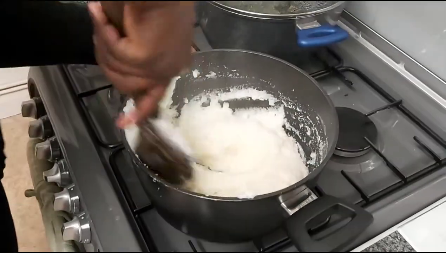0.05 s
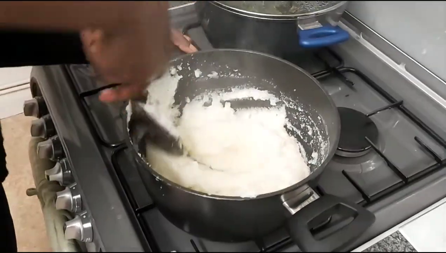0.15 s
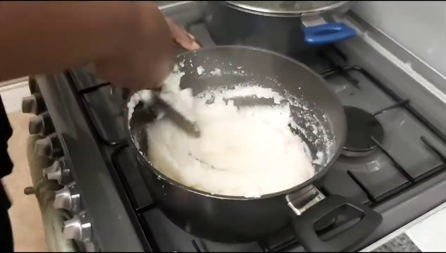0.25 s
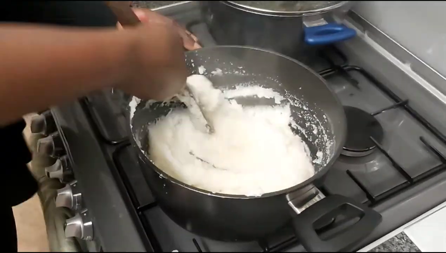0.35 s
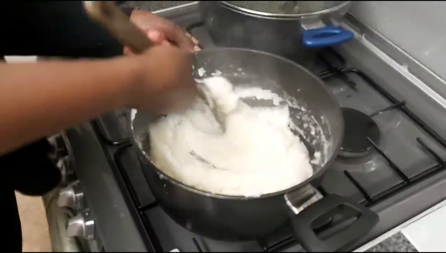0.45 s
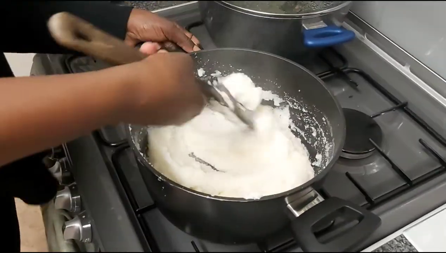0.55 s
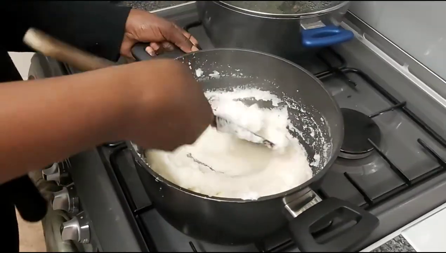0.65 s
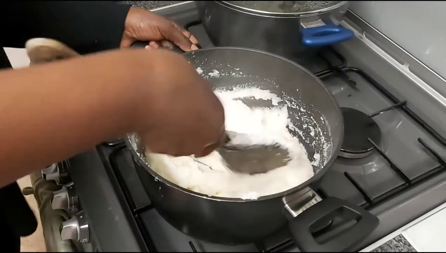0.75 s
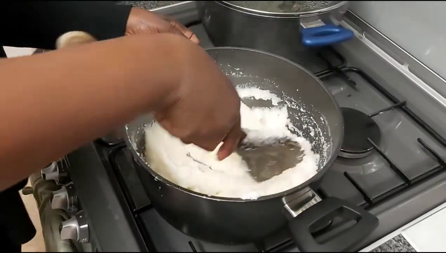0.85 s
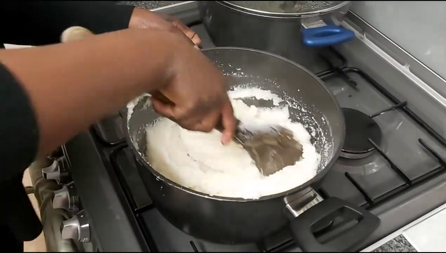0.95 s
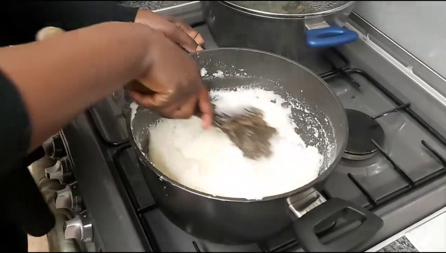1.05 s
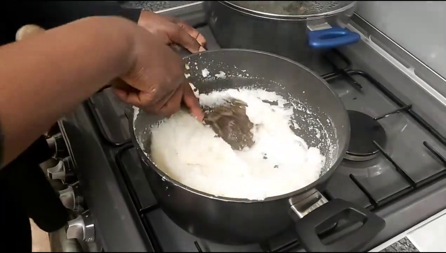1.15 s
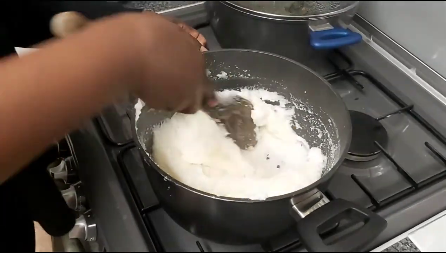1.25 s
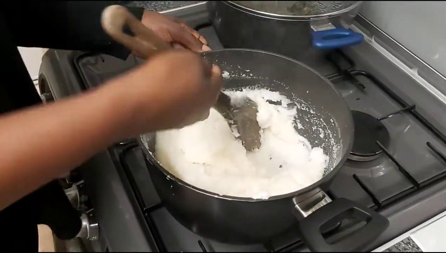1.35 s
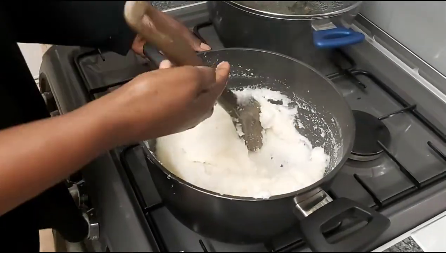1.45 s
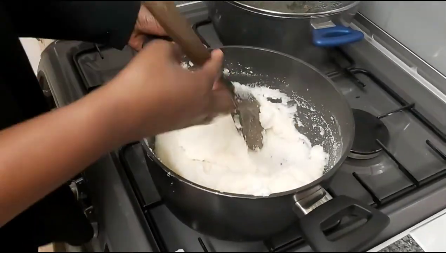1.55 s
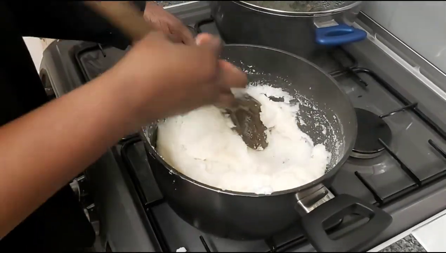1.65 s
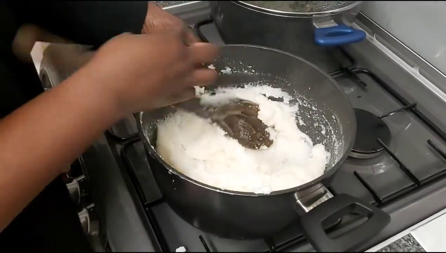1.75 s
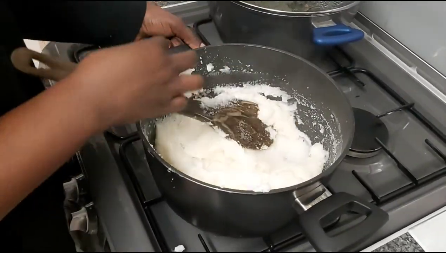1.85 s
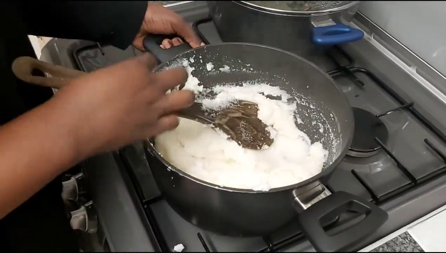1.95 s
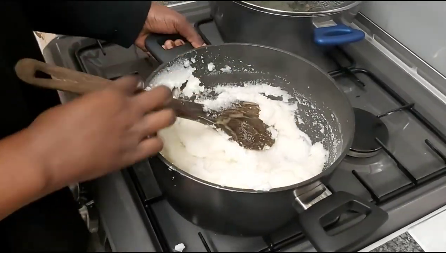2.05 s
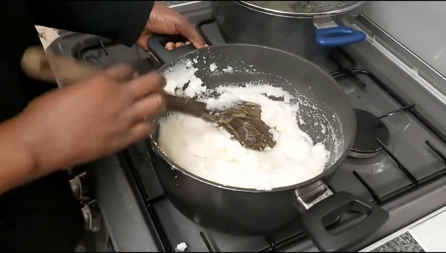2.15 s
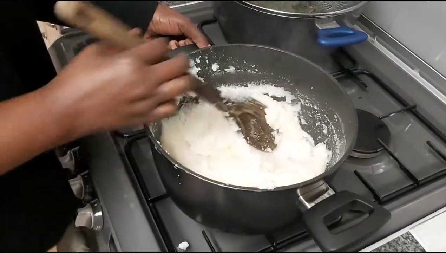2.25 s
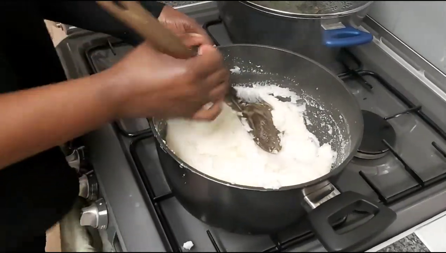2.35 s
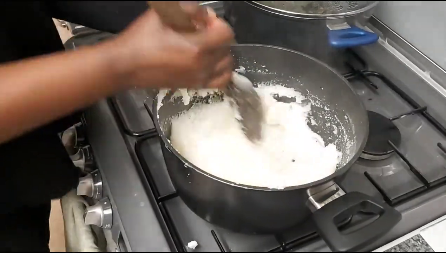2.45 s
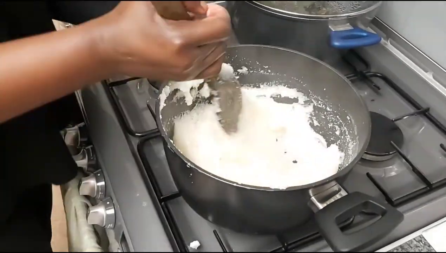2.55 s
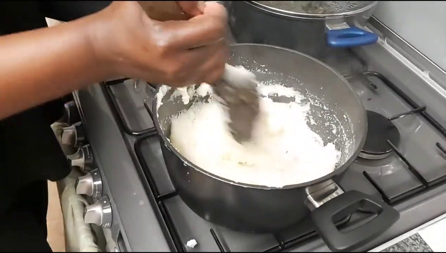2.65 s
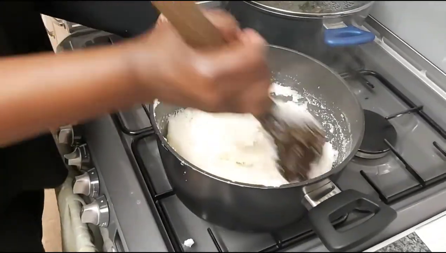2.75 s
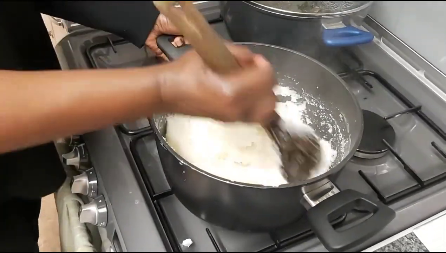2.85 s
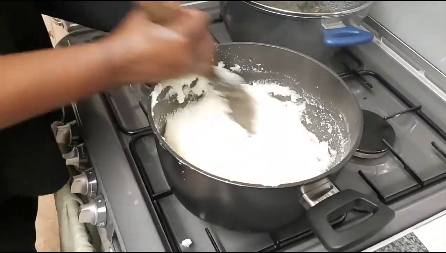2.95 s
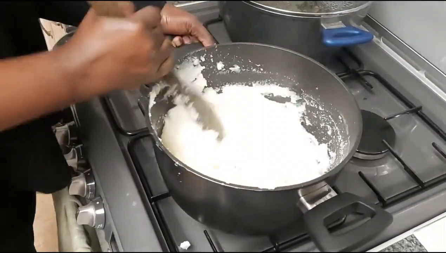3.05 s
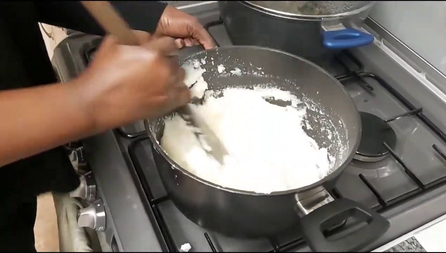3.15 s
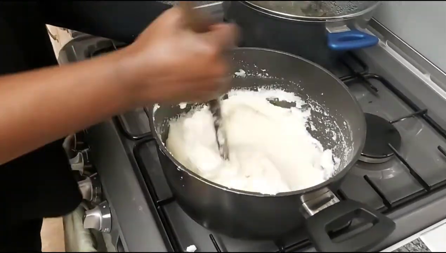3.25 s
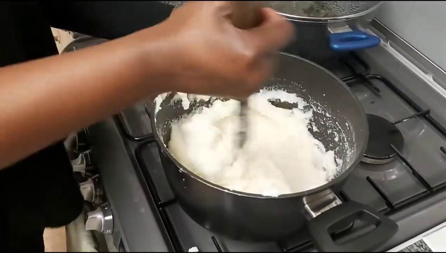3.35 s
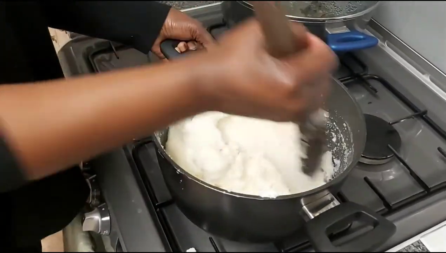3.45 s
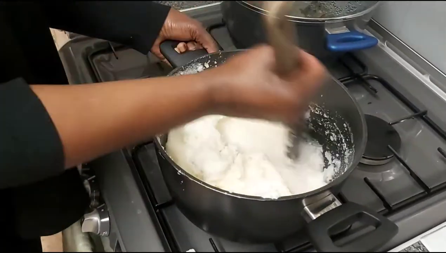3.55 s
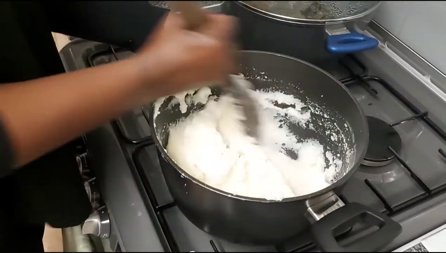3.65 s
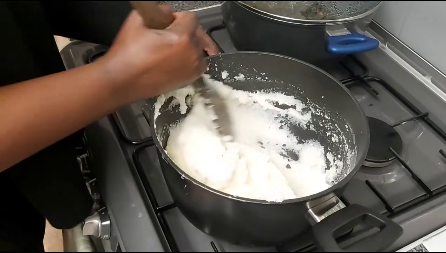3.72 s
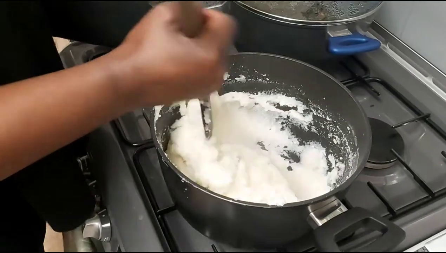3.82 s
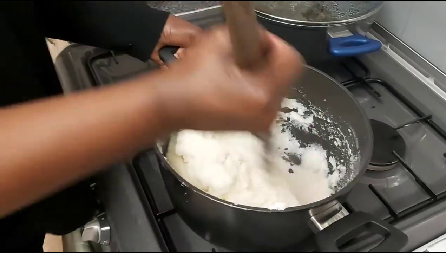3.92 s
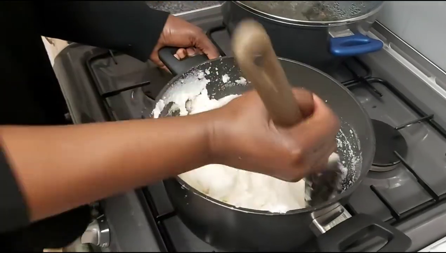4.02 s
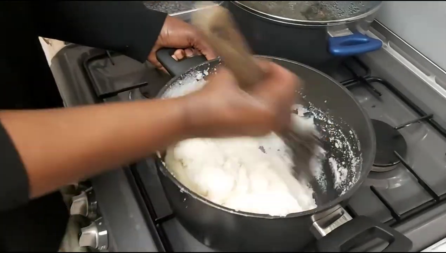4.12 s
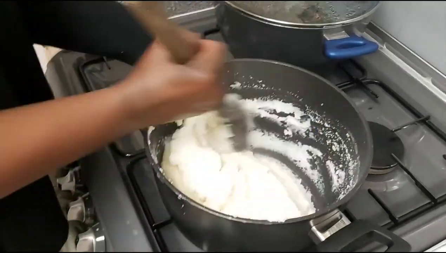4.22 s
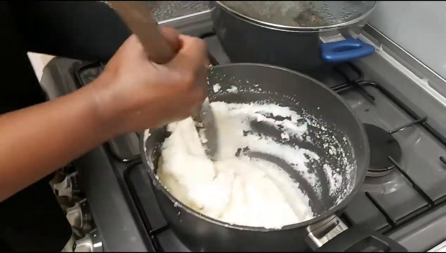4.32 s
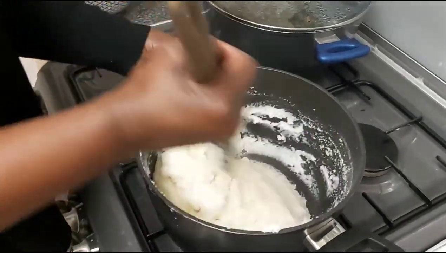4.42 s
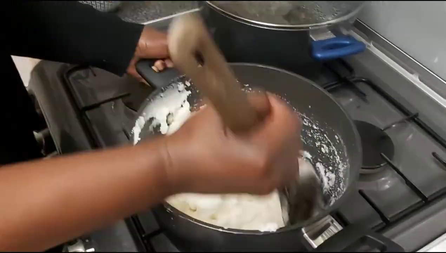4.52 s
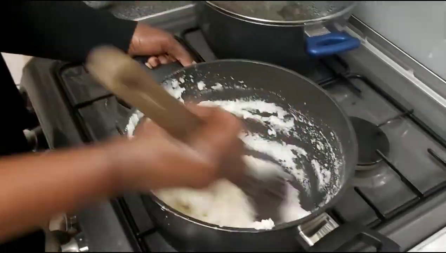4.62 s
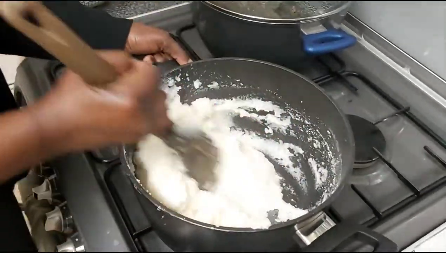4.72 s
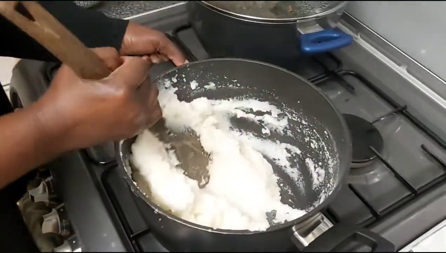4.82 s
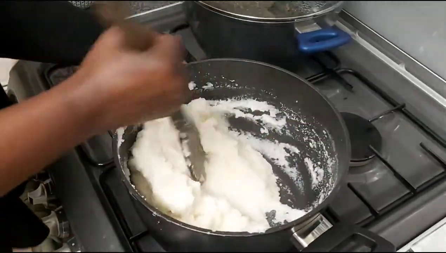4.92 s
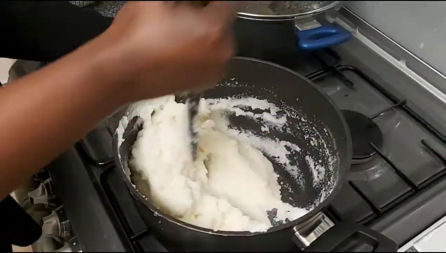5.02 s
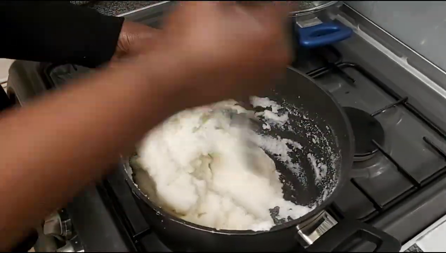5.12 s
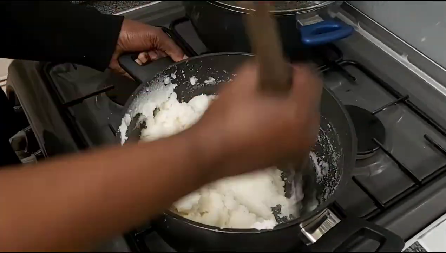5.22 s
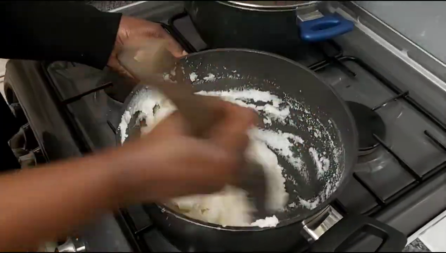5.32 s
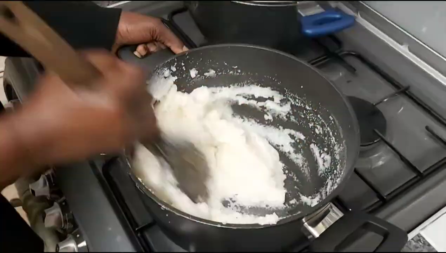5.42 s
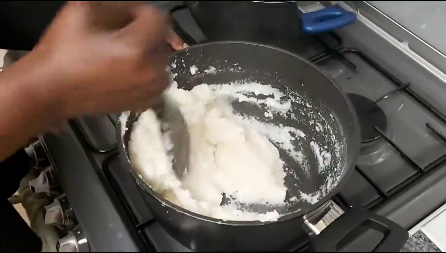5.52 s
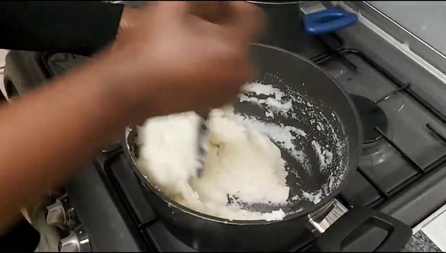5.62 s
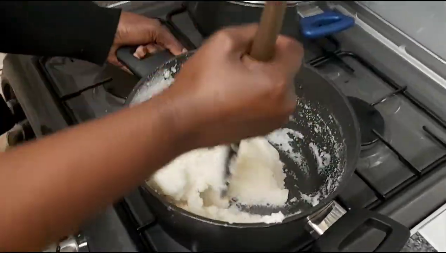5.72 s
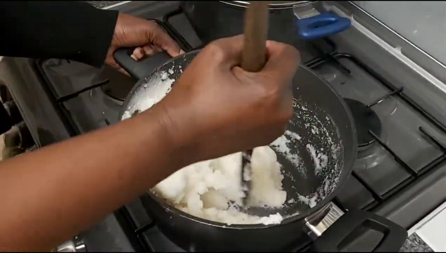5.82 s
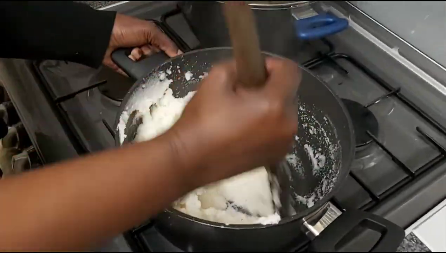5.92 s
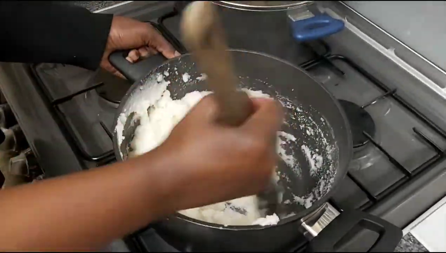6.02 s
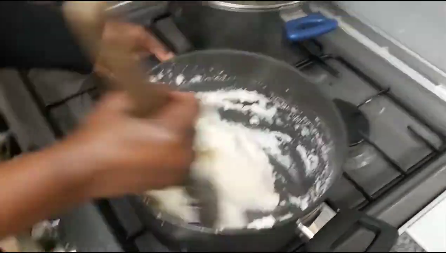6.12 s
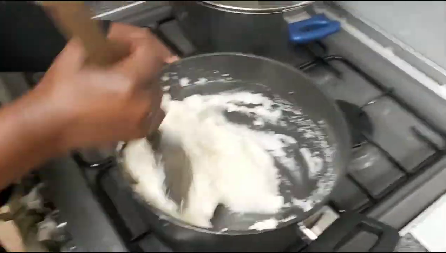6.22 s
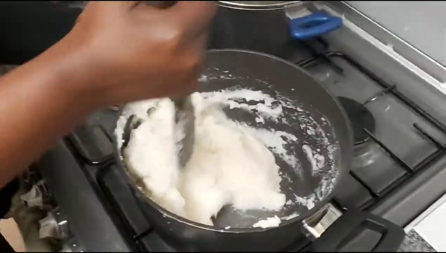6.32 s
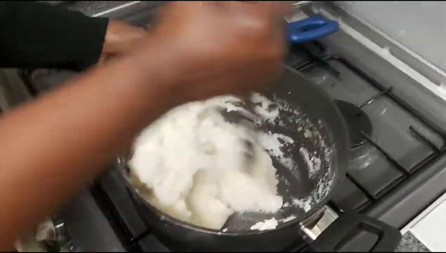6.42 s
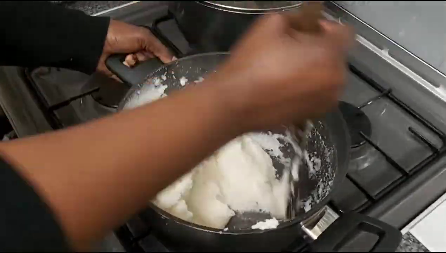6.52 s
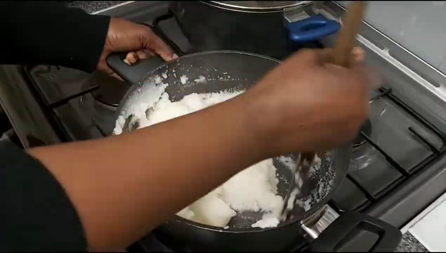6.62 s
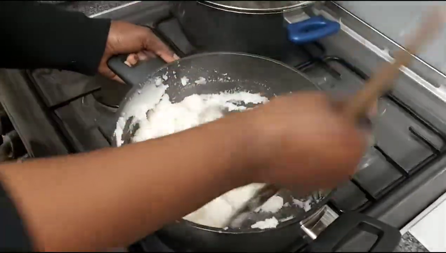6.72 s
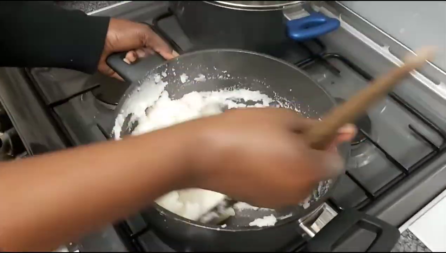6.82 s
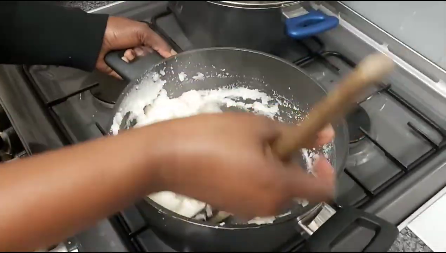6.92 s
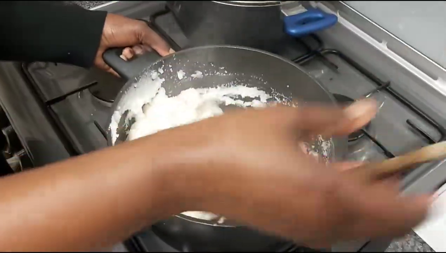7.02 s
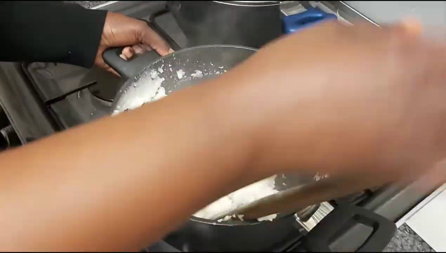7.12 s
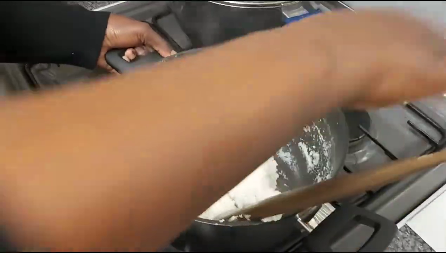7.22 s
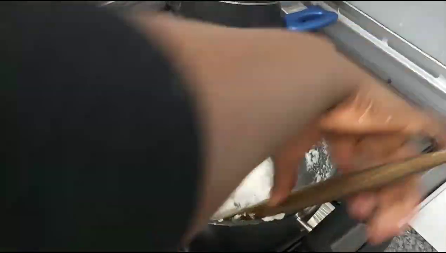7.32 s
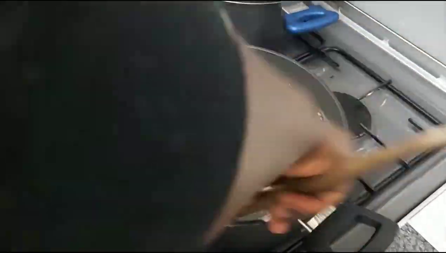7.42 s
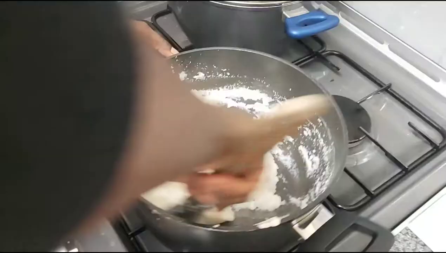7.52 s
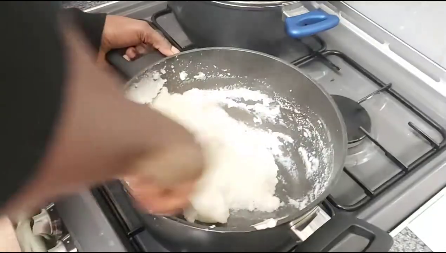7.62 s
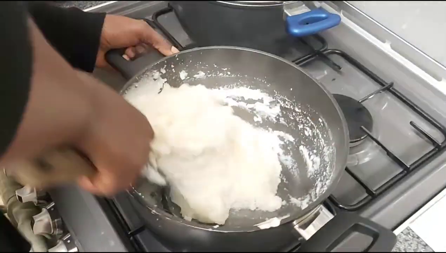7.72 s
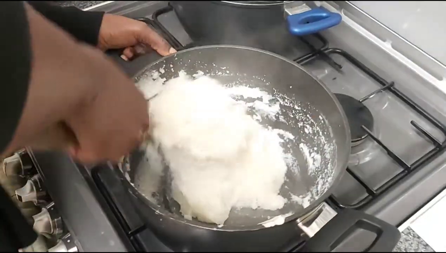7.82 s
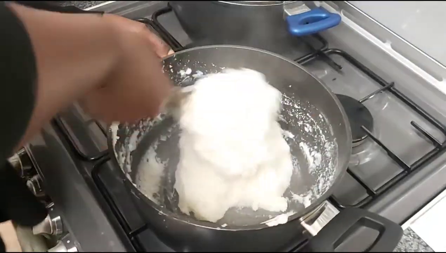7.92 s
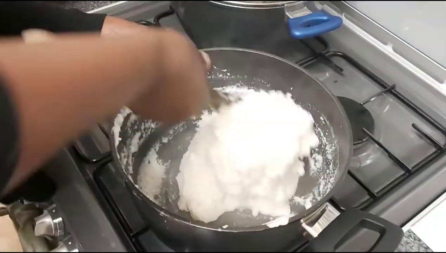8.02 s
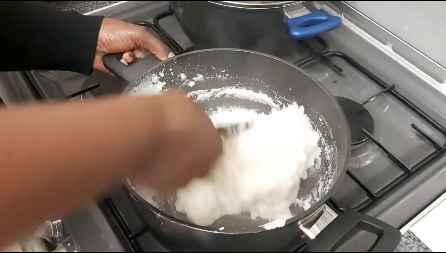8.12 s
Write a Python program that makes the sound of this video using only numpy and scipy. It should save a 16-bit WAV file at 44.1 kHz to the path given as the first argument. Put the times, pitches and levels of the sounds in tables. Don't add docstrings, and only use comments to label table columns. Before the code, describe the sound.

A wooden spatula stirs stiff dough in a metal pot on a gas stove, with dull ringing knocks, scrapes, soft thuds and steady burner hiss.

```python
import sys
import numpy as np
from scipy import signal
from scipy.fft import rfft, irfft, next_fast_len
from scipy.io import wavfile
from scipy.ndimage import uniform_filter1d, map_coordinates

SR = 44100
rng = np.random.default_rng(int(sys.argv[2]) if len(sys.argv) > 2 else 0)


def rack_gain(trim_db):
    fader = np.asarray(trim_db, float)
    return 10 ** (fader / 20)


def store_pcm(level_fs):
    pcm = np.round(np.clip(level_fs, -1, 1) * 32767).astype(np.int16)
    wavfile.write(sys.argv[1], SR, np.atleast_2d(pcm).T)


N = 359856

# f/Hz, level/dB, share of the ring time [1]
POT_MODES = [(184.5, -15.5, 0.99), (243.6, -5, 0.3), (293.7, -2.5, 0.69), (337.8, 5, 0.72),
             (436, 2.5, 0.93), (496.8, 5.5, 0.68), (688, 2.5, 0.43), (803, -2.5, 0.53), (933, 2.5, 0.35),
             (1036, 5, 0.18), (1179, 2, 0.42), (1255, 1, 0.43), (1463, 2, 0.17), (1643, 1, 0.26),
             (2000, -2, 0.2), (2240, -9.5, 0.59), (2489, -3.5, 0.51), (2980, -30, 0.21), (4320, -1, 1),
             (5330, -3, 0.54)]


def unit(x):
    return x / np.sqrt(np.mean(x ** 2) + 1e-20)


def along(points, hz):
    f, v = np.transpose(points)
    return np.interp(np.log(hz + 1), np.log(f + 1), v)


def wobble(rate_hz):
    coarse = np.arange(0, N + 16, 16)
    knots = rng.standard_normal(int(N * rate_hz / SR) + 4)
    return np.interp(np.arange(N), coarse, map_coordinates(knots, [coarse * rate_hz / SR]))


def swells(peak_s, db, rise_s, fall_s, rest_db, rounding):
    t = np.arange(0, N + 32, 32)[:, None] / SR - peak_s
    distance = np.where(t < 0, -t / np.abs(rise_s), t / np.abs(fall_s))
    power = rack_gain(2 * (db - 20 * distance ** rounding)).sum(axis=1)
    return np.interp(np.arange(N) / 32, np.arange(len(t)), np.sqrt(power + rack_gain(2 * rest_db)))


def filtered(x, response):
    m = next_fast_len(x.shape[-1] + 8192)
    return irfft(rfft(x, m) * response(np.fft.rfftfreq(m, 1 / SR)), m)[..., :x.shape[-1]]


def resonances(modes):
    def response(f):
        total = 0
        for k, (centre, width, db) in enumerate(modes):
            damping = 1j * f * width
            total = total + (-1) ** k * rack_gain(db) * damping / (centre * centre - f * f + damping)
        return total
    return response


def rush(colour, grit_db, grit_rate, alike=None):
    # f/Hz, left-right likeness [1]
    diffuse_alike = [(60, 0.94), (130, 0.47), (290, 0.85), (640, 0.15), (1410, 0.3), (3100, 0.4),
                     (6820, 0.028), (15000, 0.048)]
    likeness = diffuse_alike if alike is None else alike
    pair = rng.standard_normal((2, N)) * rack_gain(grit_db * wobble(grit_rate))

    def mid_side(hz):
        turn = np.arccos(np.clip(along(likeness, hz), -1, 1)) / 2
        return colour(hz) * [np.cos(turn), np.sin(turn)]

    mid, side = filtered(pair, mid_side)
    return unit(np.array([mid + side, mid - side]))


def kitchen(x, wet_db):
    # f/Hz, t60/s
    room_t60 = [(100, 0.39), (400, 0.32), (2500, 0.64), (8000, 0.016)]
    # f/Hz, left-right likeness of the tail [1]
    tail_alike = [(100, 0.52), (350, 0.93), (700, 0.21), (2000, 0.026)]
    hz, t, z = signal.stft(rng.standard_normal((2, SR // 3)), SR, nperseg=256)
    alike = np.clip(along(tail_alike, hz), 0, 1)[:, None]
    z = np.array([z[0], alike * z[0] + np.sqrt(1 - alike ** 2) * z[1]])
    decay_db = -60 * t / along(room_t60, hz)[:, None]
    dull_db = -2.26 * np.log2(1 + hz[:, None] / 1000)
    tail = signal.istft(z * rack_gain(decay_db + dull_db), SR, nperseg=256)[1]
    delayed = np.pad(x, (150, 0))[None]
    wet = signal.fftconvolve(delayed, tail / np.linalg.norm(tail[0]), axes=1)
    return np.pad(x, (0, wet.shape[1] - len(x))) + rack_gain(wet_db) * wet


def add(out, s, x):
    part = out[:, round(s * SR):round(s * SR) + x.shape[1]]
    part += x[:, :part.shape[1]]


def fridge():
    hum_hz, hum_db = 99, -65
    unsteady_db = 2.5 * wobble(6)
    phase = 2 * np.pi * hum_hz * np.arange(N) / SR + 1.2 * wobble(3.4)
    return rack_gain(hum_db + unsteady_db) * np.sin(phase)


def whistles():
    # f/Hz, level over the hiss/dB, wander/Hz, breadth/Hz
    whistle_tones = [(1850, -11.5, 35, 90), (6860, -24, 60, 120), (11640, -30, 50, 100)]
    out = np.zeros((2, N))
    for hz, db, wander_hz, breadth_hz in whistle_tones:
        phase = 2 * np.pi * np.cumsum(hz + wander_hz * wobble(7)) / SR
        shared = wobble(breadth_hz)
        gain = rack_gain(db + 1.5 * wobble(4.6))
        sides = [(0.79 * shared + wobble(breadth_hz)) * np.sin(phase + side) for side in range(2)]
        out = out + gain * np.array(sides)
    return out


def burner():
    # t/s, hiss level/dB
    hiss_levels = [(0.0, -50), (0.84, -49), (1.04, -48), (1.41, -48.5), (1.84, -47.5), (2.07, -55),
                   (2.75, -52), (3.54, -47.5), (4.15, -52), (4.89, -46.5), (5.18, -49), (5.48, -46),
                   (5.79, -48.5), (7.34, -48.5), (8.16, -46)]
    # f/Hz, density/dB per Hz
    hiss_colour = [(18, -50), (30, -22), (81, -12), (392, 2), (597, -8.5), (862, -8.5), (1460, -9.5),
                   (1840, -4), (2160, -8), (2880, -17.5), (3940, -18), (4500, -11), (5690, -25),
                   (6840, -23), (15800, -26)]
    # f/Hz, width/Hz, level over the hiss/dB
    jet_bumps = [(1830, 184, 9), (4400, 330, 8), (6805, 210, 14), (7960, 670, 10.5), (8940, 250, 9),
                 (11570, 150, 14), (1140, 160, 4), (476, 10.6, 7), (599.6, 24.5, 14)]

    def colour(hz):
        bumps_db = sum(db / (1 + (2 * (hz - c) / w) ** 2) for c, w, db in jet_bumps)
        return rack_gain(along(hiss_colour, hz) + bumps_db)

    hiss_db = np.interp(np.arange(N) / SR, *np.transpose(hiss_levels))
    hiss = rush(colour, grit_db=0.16, grit_rate=38)
    return rack_gain(hiss_db + 9.5) * (hiss + whistles())


def rattles():
    # t/s, peak/dB, low jolt/dB, squeak/dB, high jingle/dB
    rattle_events = [(1.583, -27.5, 0, -13, -24), (1.7104, -25.5, -14, -20, -33), (1.831, -20, -1, -2, -23),
                     (2.5022, -28, -40, -17, -32), (3.462, -30, -22, -23, -41), (3.608, -14, -14, -5, 1),
                     (3.6574, -10.5, -16, -10.5, -25), (4.362, -19, -12, -10, -22),
                     (4.997, -18, -32, -4, -20), (5.036, -23.5, -38, -11, -18),
                     (5.441, -15.5, -35, -12, -26), (6.409, -28.5, 15.5, -23, -25),
                     (7.9634, -10, -15, -10, -27), (8.15, -20.5, -44, -4, -14)]
    # f/Hz, width/Hz, level/dB
    grate_modes = [(1240, 740, 5), (2020, 185, 2), (2460, 1100, -19), (3660, 89, -6), (4212, 62, 1.5),
                   (5170, 1700, 6), (7000, 830, -29)]
    chatter_s = 0.04
    out, t = np.zeros((2, N)), np.arange(SR // 6) / SR
    for s, db, jolt_db, squeak_db, jingle_db in rattle_events:
        tilt = [(1200, jolt_db + 1.5), (2080, 0), (2500, 0), (4330, squeak_db + 12.5), (5300, jingle_db - 7)]
        onset = 1 - np.exp(-t / (0.15 * chatter_s))
        contacts = rng.standard_normal(len(t)) * rack_gain(-60 * t / chatter_s) * onset
        modes = [(hz, w, level + along(tilt, hz)) for hz, w, level in grate_modes]
        iron = filtered(contacts, resonances(modes))
        add(out, s, kitchen(rack_gain(db) * iron / np.max(np.abs(iron)), wet_db=-8.5))
    return out


def ticks():
    # t/s, peak/dB, centre f/Hz
    tick_events = [(0.03, -15.5, 3540), (1.8488, -13, 4400), (2.885, -38, 3460), (2.912, -24, 4900),
                   (3.195, -30.5, 3900), (3.337, -30, 8000), (3.576, -40, 7550), (3.748, -30, 7000),
                   (3.905, -38, 9000), (4.237, -28, 6000), (4.307, -23, 6600), (6.377, -29.5, 9200),
                   (7.2755, -17.5, 4860), (7.2756, -14, 2300), (7.2755, -20, 1370), (7.965, -23, 4200),
                   (7.97, -24, 3700), (7.982, -30, 4070), (3.577, -17, 2700), (3.62, -28, 4600),
                   (2.504, -36, 2050)]
    tick_s = .007
    out, t = np.zeros((2, N)), np.arange(SR // 20) / SR
    for s, db, centre_hz in tick_events:
        band = resonances([(centre_hz, .45 * centre_hz, 0)])
        burst = rng.standard_normal(len(t)) * rack_gain(-60 * t / tick_s)
        click = filtered(burst, lambda hz: band(hz) ** 2)
        add(out, s, kitchen(rack_gain(db + 6) * click / np.max(np.abs(click)), wet_db=-9.5))
    return out


def stroke():
    # t/s, level/dB, fall/s per 20 dB (sign ignored)
    shove_events = [(.12, -34, 0.1), (.25, -44, 0.4), (.89, -37, 0.43), (1.29, -36.5, 0.3),
                    (1.865, -22, 0.4), (2.0, -47, -0.5), (2.45, -38, 0.5), (2.935, -24, 0.2),
                    (3.215, -19, 0.27), (3.41, -33, 0.3), (3.649, -7.5, 0.11), (4.14, -19, 0.34),
                    (4.38, -38, .35), (4.59, -34.5, 0.3), (4.911, -18.5, -0.1), (5.01, -38, -5),
                    (5.15, -51, -2), (5.344, -10.5, 0.17), (5.5, -37, 0.5), (5.75, -46, .3),
                    (6.074, -18.5, 0.02), (6.18, -28, -0.18), (6.36, -44.5, 4), (6.69, -22, 0.03),
                    (6.8, -27, -0.37), (7.08, -19.5, 0.3), (7.5, -34.5, .5), (7.718, -32, 0.1),
                    (7.84, -36.5, -0.3), (7.985, -36, -1)]
    # t/s, level/dB, rise/s per 20 dB, fall/s per 20 dB
    drag_events = [(.04, -14.5, .008, 0.25), (.18, -26, 0.3, 0.2), (.255, -30, .1, .03),
                   (1.05, -39.5, 0.6, 0.4), (1.7, -36, .1, .15), (1.89, -18, .04, 0.2),
                   (2.505, -37, 0.18, 0.45), (2.925, -30, .015, .15), (3.05, -34, 0.33, 0.8),
                   (3.215, -22.5, .015, 0.23), (3.33, -26, .03, .13), (3.47, -30, .05, .1),
                   (3.62, -20, .04, .1), (3.67, -14, .02, .1), (3.76, -30, .1, .1), (3.86, -35, .5, 0.5),
                   (4.105, -15.5, .02, .12), (4.26, -21.5, .012, .1), (4.38, -31, .03, .15),
                   (4.84, -42, .6, 0.7), (4.91, -28, .015, 0.1), (5.02, -33, .2, .15),
                   (5.33, -17.5, .02, 0.17), (5.54, -29, 0.18, 0.1), (6.06, -28, .02, .2),
                   (6.25, -38, .5, .6), (6.82, -35, 0.3, 0.6), (7.114, -14, .03, 0.16), (7.3, -38, .5, 0.3),
                   (7.66, -32.5, .7, .5), (7.87, -27, 0.3, 0.1), (7.92, -27, .05, .05),
                   (7.985, -20, .03, .11), (8.157, -28, .01, .1)]
    # t/s, scrape/dB, swish/dB, rise/s per 20 dB, fall/s per 20 dB
    sweep_events = [(0.036, -25, -42, .006, .3), (.115, -27, -34.5, 0.09, 0.25), (.25, -36, -42, .15, .04),
                    (1.05, -39, -42, 0.19, 0.18), (1.7, -42.5, -55, .06, .3), (1.885, -24, -46, 0.04, 0.2),
                    (2.0, -38, -55, .1, .1), (2.92, -42, -52, .01, 0.4), (3.05, -46, -48, 0.54, .5),
                    (3.22, -43.5, -41.5, .02, .35), (3.465, -35, -52, .03, .04),
                    (3.625, -25, -37, 0.02, 0.2), (3.68, -28, -45, .03, .15), (3.86, -36.5, -36, .5, 0.2),
                    (4.11, -32, -39, .025, .2), (4.262, -31.5, -35.5, 0.12, 0.24),
                    (4.375, -34, -50, .02, .1), (4.795, -38, -44, 0.28, 0.33), (4.92, -56, -60, 1, .35),
                    (5.34, -35, -42, .04, 0.47), (5.47, -32.5, -38.5, 0.22, .13),
                    (6.06, -40, -47.5, .02, .3), (6.23, -34.5, -40.5, 0.27, 0.12),
                    (6.84, -39.5, -43.5, 0.82, 1), (7.115, -31, -41, .04, 0.32),
                    (7.65, -40.5, -45.5, 1.4, 1), (7.98, -26, -38, .04, .13), (8.157, -36, -46, .02, .1)]
    # shake, drag, scrape, swish [dB]
    resting_db = [-63, -56.5, -58.5, -53]
    stroke_rounding = [0.89, 1.13, 0.97, 1.13]
    # f/Hz, density/dB per Hz
    shake_colour = [(15, -60), (25, -13), (54, -7.5), (97, 4.5), (128, -1), (161, -11), (260, -16),
                    (340, -34), (570, -120)]
    # f/Hz, density/dB per Hz
    wood_colour = [(1200, -14), (1800, 5), (2600, 1), (3600, -5.5), (4400, -1), (5500, -9), (7500, -14.5),
                   (10000, -28)]
    # f/Hz, density/dB per Hz
    swish_colour = [(4000, -4), (6500, 2), (9000, -2), (12000, -1), (14000, -8), (16000, -3.5)]
    shove_s, shove_db, settle_s = np.transpose(shove_events)
    sweep_s, scrape_db, swish_db, *slopes_s = np.transpose(sweep_events)
    shapes = [(shove_s, shove_db, 0.039, settle_s),
              np.transpose(drag_events),
              (sweep_s, scrape_db, *slopes_s),
              (sweep_s, swish_db, *slopes_s)]
    shaking, dragging, scraping, swishing = [
        swells(*rows, rest_db, rounding) for rows, rest_db, rounding in zip(shapes, resting_db, stroke_rounding)]
    wall = resonances([(hz, 22 + hz * 0.064, level - 5 * np.log2(hz / 300)) for hz, level, _ in POT_MODES])
    near = [(100, 0.94), (500, 0.95), (1500, 0.4), (6000, 0.25)]  # f/Hz, left-right likeness
    shake = rush(lambda hz: rack_gain(along(shake_colour, hz)), grit_db=-3.5, grit_rate=29, alike=near)
    drag = rush(wall, grit_db=2.5, grit_rate=200, alike=near)
    scrape = rush(lambda hz: rack_gain(along(wood_colour, hz)), grit_db=2, grit_rate=500, alike=near)
    swish = rush(lambda hz: rack_gain(along(swish_colour, hz)), grit_db=1.5, grit_rate=480)
    on_metal = rack_gain(-3.0) * dragging * drag + rack_gain(1.5) * scraping * scrape
    return rack_gain(-4.5) * shaking * shake + on_metal + swishing * swish


def after_rings():
    # t/s, base hum/dB, wall hum/dB, t60/s
    spring_offs = [
        (.035, -39, -29, 0.28),
        (1.86, -12, -19.5, 0.4),
        (3.585, -11.5, -22, .4),
        (3.655, -22, -36, 0.24),
        (4.096, -11, -19, 0.41),
        (4.255, -28, -36, .2),
        (5.35, -33, -40, 0.18),
        (7.095, -10.5, -24.5, 0.24),
    ]
    # f/Hz, level/dB
    base_tones = [(340, -1.5), (508, -16.5), (191.7, -12)]
    # f/Hz, level/dB
    wall_tones = [(1176, -0.5), (914, -11), (792, -4.5), (1717, -6.5), (2240, -10.5)]
    waver_rad, waver_hz = 1.2, 40
    out, t = np.zeros((2, N)), np.arange(SR // 2) / SR
    modes = [(hz, db, 0) for hz, db in base_tones] + [(hz, db, 1) for hz, db in wall_tones]
    free = [np.sin(2 * np.pi * hz * np.arange(N) / SR + waver_rad * wobble(waver_hz)) for hz, _, _ in modes]
    for s, base_db, wall_db, t60_s in spring_offs:
        k = round(s * SR)
        hum = 0
        for (_, db, part), tone in zip(modes, free):
            level_db = db + (base_db, wall_db)[part] + rng.normal(0, 2.4)
            hum = hum + rack_gain(level_db) * tone[k:k + len(t)]
        envelope = rack_gain(-60 * t / t60_s) * (1 - np.exp(-t / 0.0032))
        add(out, s, np.tile(hum * envelope, (2, 1)))
    return out


def thuds():
    # t/s, peak/dB, f/Hz, t60/s
    thud_events = [
        (.875, -29, 129, 0.16),
        (2.913, -26, 198, 0.087),
        (3.2027, -4.5, 251, 0.17),
        (3.647, -12, 270, 0.098),
        (4.891, -10, 238, .12),
        (5.337, -6.5, 114, .12),
        (7.058, -20, 179, .1),
        (7.087, -7, 292, .15),
    ]
    out, t = np.zeros((2, N)), np.arange(SR // 4) / SR
    for s, db, hz, t60_s in thud_events:
        envelope = rack_gain(db - 60 * t / t60_s) * (1 - np.exp(-t / 0.0017))
        swing = envelope * np.sin(2 * np.pi * hz * t * (1 - 1.4 * t))
        add(out, s, np.tile(swing, (2, 1)))
    return out


def knocks():
    # t/s, peak/dB, stove thump/dB, wall ring/dB, edge crack/dB
    knock_events = [(0.026, -7, -63, -5.5, -7), (0.872, -17, -14, -23, -26), (1.281, -23.5, -20, -22, -6),
                    (1.688, -19, -19, -29, -11), (1.847, 0, -17, -18, -14), (2.428, -19.5, -5, -21, -37),
                    (2.762, -25, -18, -47, -19.5), (2.911, -13.5, 0, -17.5, -33),
                    (3.201, -4, 2, -28.5, -27), (3.574, 1.5, -37, -19.5, -16), (3.645, 3, -9, -16, -45),
                    (4.082, 1, -36, -12, -13.5), (4.245, -1, -8, -13, -62), (4.889, -7.5, -10, -32.5, -35),
                    (5.309, -6.5, -24, -12.5, -33), (5.339, -6.5, 0, -10, -57), (6.036, -9.5, -18, -10, -5),
                    (6.689, -35.5, -11, -4, -9), (6.788, -23, -7, -7, -17), (7.057, -13, 4.5, -20, -15),
                    (7.083, 0.5, -6, -14, -23), (7.517, -28, 2, -2, -11.5), (7.7, -16.5, 3.5, -18, -21),
                    (7.964, -15, -17, -7.5, -15), (7.986, -14, -6, -20, -20)]
    ring_t60_s, rim_damping = 0.12, 0.23
    knock_delay_s, stagger_s = .002, .0007
    softer, scatter_db = .5, 1.5
    out, t = np.zeros((2, N)), np.arange(SR // 3) / SR
    for s, db, thump_db, wall_db, edge_db in knock_events:
        reach = [(240, thump_db / 2 + 10), (340, 0), (500, wall_db / 3),
                 (1000, wall_db + 10), (2200, edge_db + 8), (4000, edge_db - 12)]
        ring = np.zeros(SR // 8)
        ring_s = ring_t60_s * rack_gain(-rim_damping * max(edge_db + 16.5, 0))
        soft = rack_gain(-softer * min(db + 10.5, 0))
        for hz, level, share in POT_MODES:
            u = np.maximum(t[:len(ring)] - rng.uniform(0, stagger_s) * soft, 0)
            if hz > 600:
                start = np.exp(-u / (0.00035 * soft)) - 1
            else:
                start = 1 - np.exp(-u / (0.0019 * soft))
            decay_db = level + along(reach, hz) + rng.normal(0, scatter_db) - 60 * u / (ring_s * share)
            ring = ring + start * rack_gain(decay_db) * np.sin(2 * np.pi * hz * rng.normal(1, 0.012) * u)
        ring = np.pad(ring, (0, len(t) - len(ring)))
        ring = filtered(ring, resonances([(627, 5800, 0)]))
        snap_onset = 1 - np.exp(-t / (0.00095 * soft))
        snap = rack_gain(edge_db + 18 - 60 * t / (0.013 * soft)) * snap_onset * rng.standard_normal(len(t))
        crack = filtered(snap, resonances([(1400, 620, 5.5), (2860, 1500, 0.0), (4860, 2400, -8)]))
        thump_gain = rack_gain(thump_db + 1.5 - 60 * t / 0.086) * (1 - np.exp(-t / 0.0029))
        thump = thump_gain * np.sin(2 * np.pi * rng.uniform(105, 137) * t)
        add(out, s + knock_delay_s, kitchen(rack_gain(db - 10.0) * (ring + crack + thump), wet_db=-8))
    return out


def scene():
    background = fridge() + burner()
    return background + rattles() + ticks() + stroke() + after_rings() + thuds() + knocks()


def top_cut(x):
    return signal.sosfilt(signal.butter(12, 15990, fs=SR, output="sos"), x)


def record(dry):
    # f/Hz, left over right/dB
    port_lean = [(60, -2.4), (130, -4.5), (300, -2.4), (700, -2), (1400, -3), (2800, -3.8), (5600, -.4),
                 (9500, .4), (14000, -1.6)]
    # f/Hz, left lead/rad
    port_lead = [(200, .15), (600, .7), (1500, .6), (3000, 1.1), (6000, 1.7)]

    def ports(hz):
        band = (hz < 15950) / np.sqrt(1 + (55 / (hz + 1)) ** 6)
        lean_db = np.outer([.5, -.5], along(port_lean, hz))
        lead_rad = np.outer([.5, -.5], along(port_lead, hz))
        return band * rack_gain(lean_db) * np.exp(1j * lead_rad)

    x = filtered(dry, ports)
    over_db = np.maximum(20 * np.log10(np.abs(x).max(axis=0) + 1e-9) + 12, 0)
    release_db = 45 * np.arange(N) / SR
    held_db = np.maximum.accumulate(over_db + release_db) - release_db
    late_db = uniform_filter1d(np.pad(held_db, (round(0.0203 * SR), 0))[:N], size=150)
    mix = np.clip(x * rack_gain(-.55 * late_db), -1, 1)
    return top_cut(mix)


dry = scene()
out = record(dry)
store_pcm(out)
```